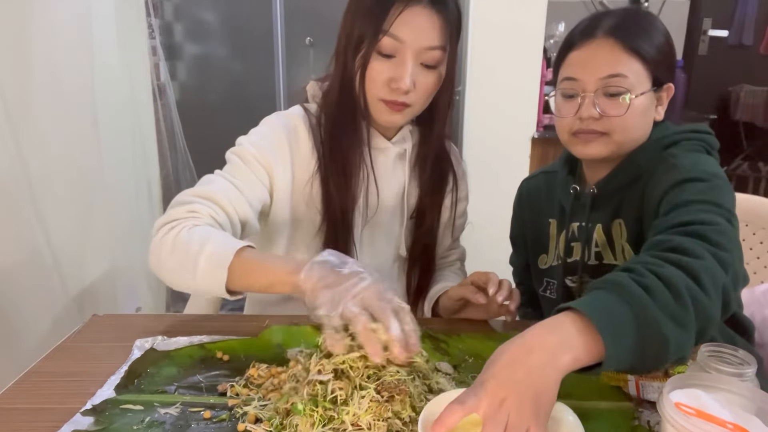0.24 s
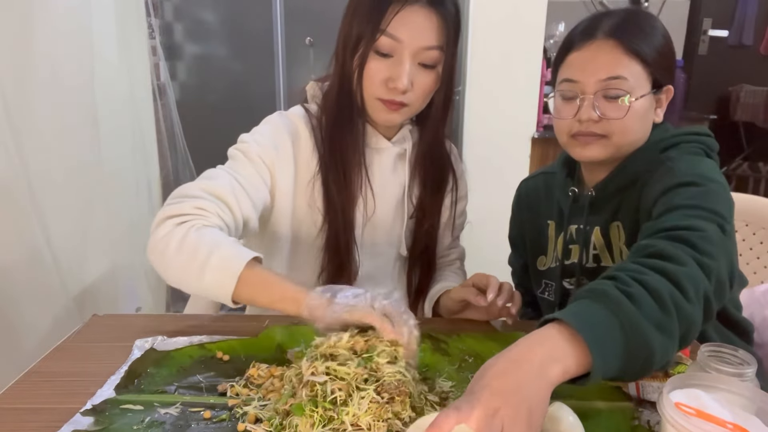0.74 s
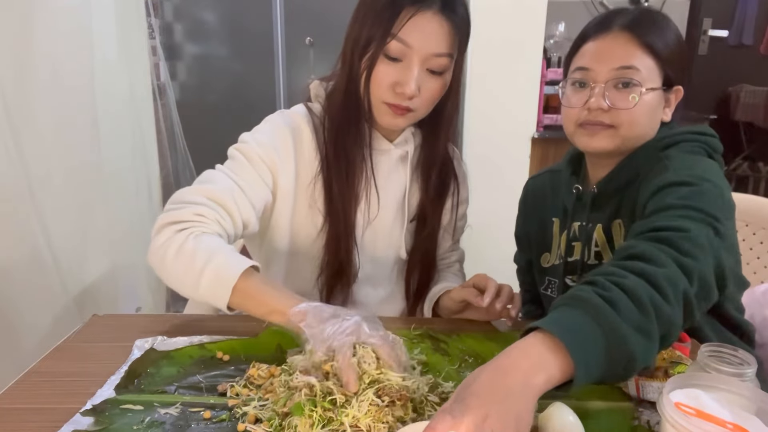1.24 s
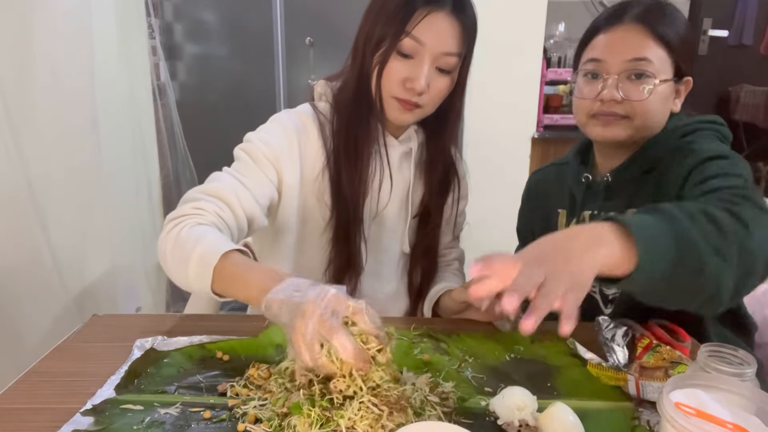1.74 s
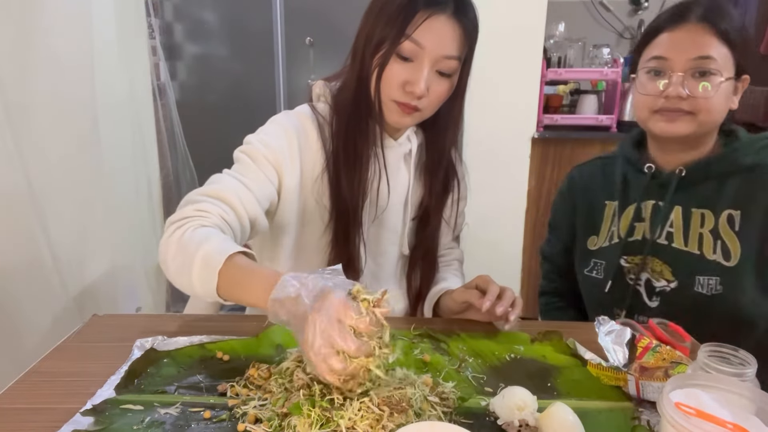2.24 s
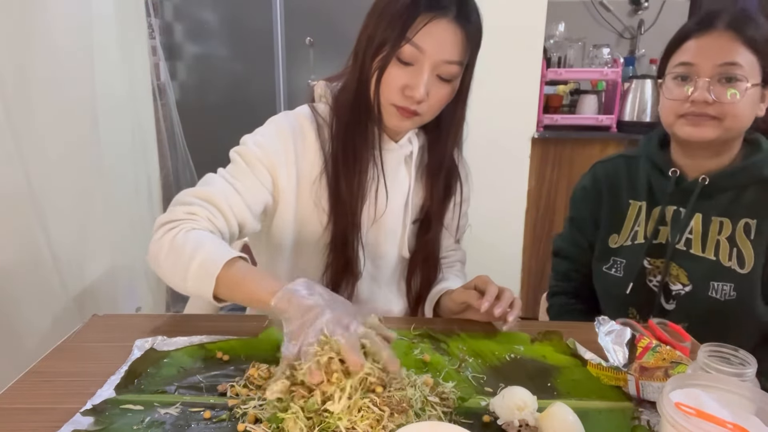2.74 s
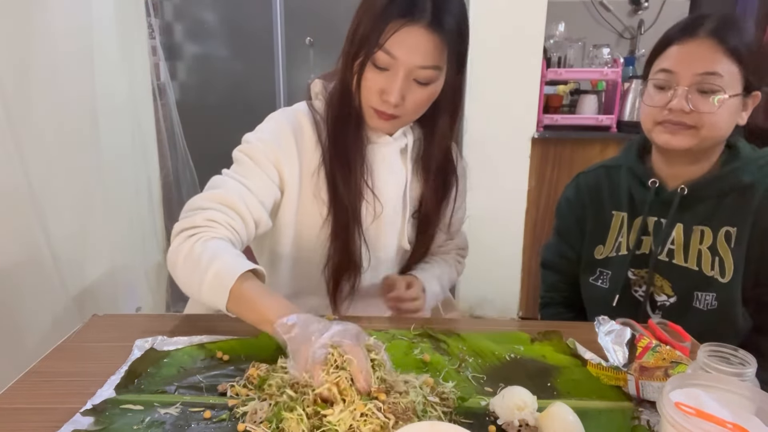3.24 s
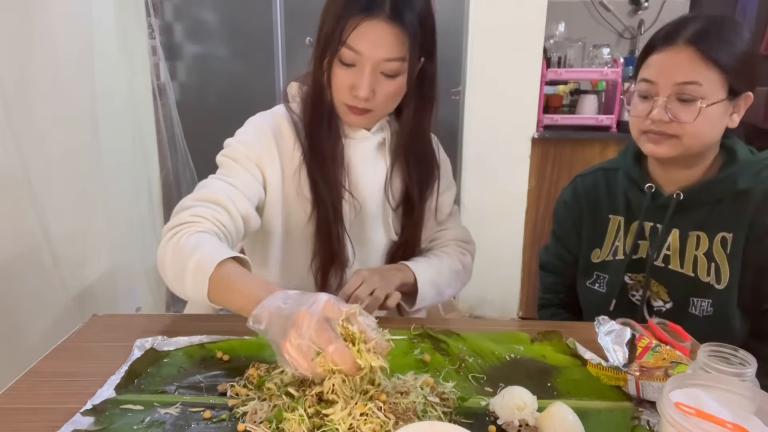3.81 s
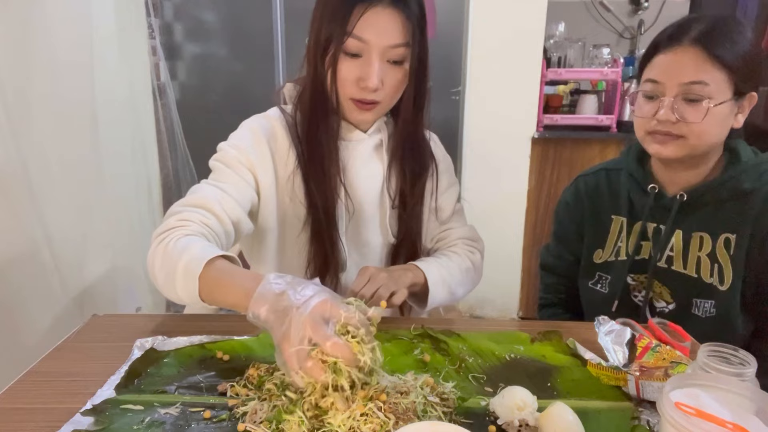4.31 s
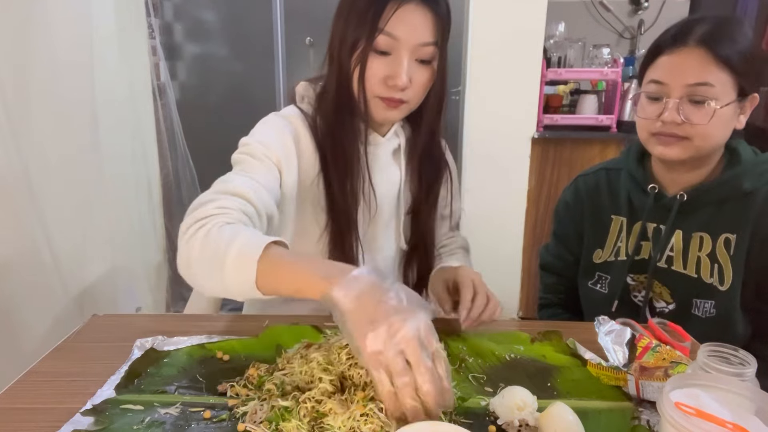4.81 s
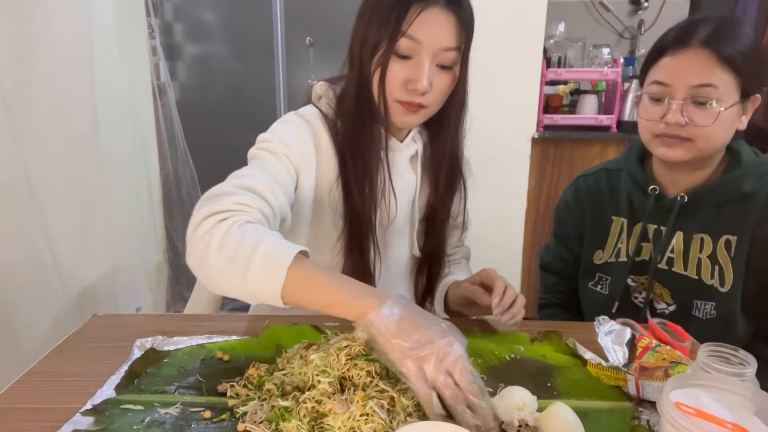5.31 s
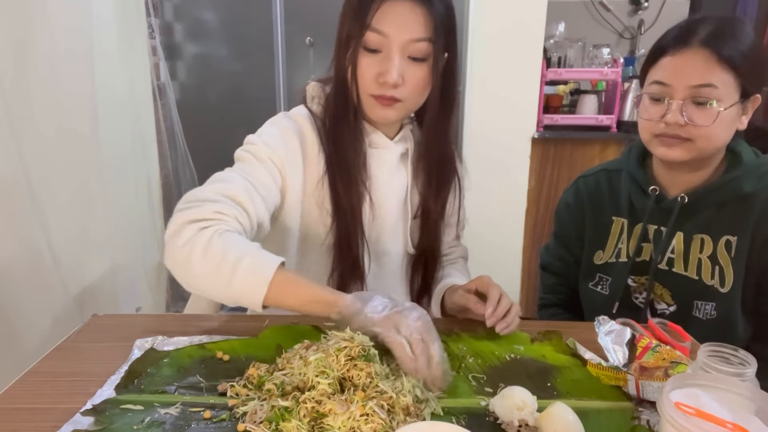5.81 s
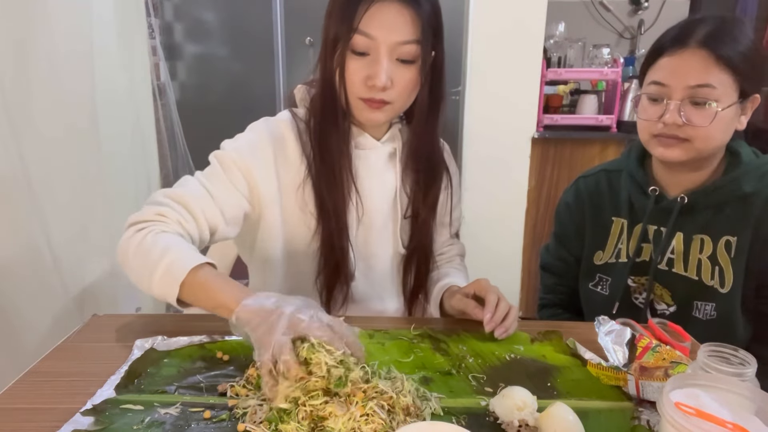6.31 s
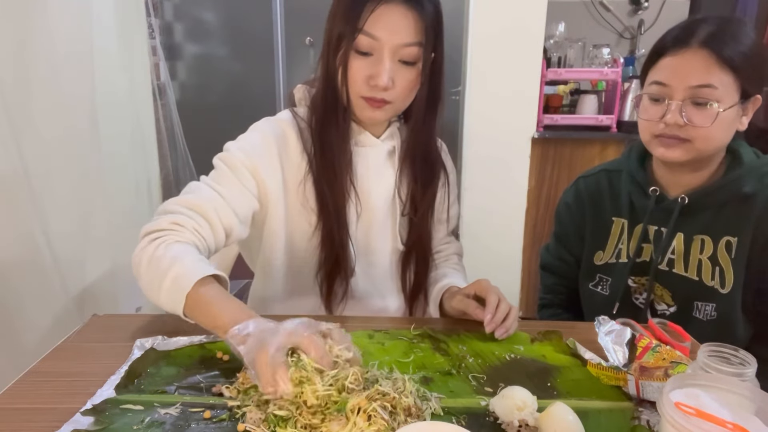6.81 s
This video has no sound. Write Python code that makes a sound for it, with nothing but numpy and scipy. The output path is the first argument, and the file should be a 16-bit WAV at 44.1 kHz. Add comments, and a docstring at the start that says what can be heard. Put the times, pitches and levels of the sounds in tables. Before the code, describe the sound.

A close stereo pickup in a small room, with a faint steady hiss throughout. From the start a gloved hand squeezes wet shreds: bright, fine film crinkle with softer moist sliding, strongest in the first 0.4 s, with a stalk crunch near 0.2 and another at 0.75. A low table thump comes at 1.26, then a soft scuff and light bowl taps around 1.65-1.8. Wooden knocks sound at 1.98, 2.19 and 2.3 while the rustle continues in strokes. A sharp flick, creak and crunch at 3.13 lead into the loudest knock at 3.23, followed by soft scuffs to 3.8. Another knock lands at 4.45; quick film snaps cluster from 4.55 to 5.0. A crisp flick at 5.64 precedes a crunch at 5.85. The rustle thins near 6.1, then returns with a creak at 6.37, low thump at 6.47 and small knock at 6.87.

```python
"""A small room with a wooden table: a gloved hand tosses and squeezes shredded salad on a leaf.
The thin glove film and wet shreds sound as random trains of damped ticks; stalks snap and crunch, the leaf creaks.
Table joints, table top and a small bowl ring as damped modes under knocks, arm pushes and taps; soft scuffs are noise.
Two closely spaced microphones hear level and phase differences and diffuse echoes, over a faint steady hiss."""
import sys
import numpy as np
from scipy import signal
from scipy.fft import rfft, irfft, next_fast_len
from scipy.io import wavfile
from scipy.ndimage import map_coordinates

SR = 44100
rng = np.random.default_rng(int(sys.argv[2]) if len(sys.argv) > 2 else 0)


def materialize(psi):
    """Save the field psi as 16-bit PCM at rate SR to the path in sys.argv[1].

    A 1-D psi becomes a single channel; in a 2-D psi each row is a channel.
    """
    bounded = np.clip(np.atleast_2d(psi).T, -1, 1)
    quanta = np.round(bounded * 32767).astype(np.int16)
    wavfile.write(sys.argv[1], SR, quanta)


N = 310993  # length in samples
CUT_HZ = 15760  # upper band limit, also the highest pitch of the glove's ticks


def amp(db):
    """Level law: decibels to amplitude gain."""
    return 10 ** (np.asarray(db) / 20)


def unit(x):
    """Power normalisation: scale to rms 1."""
    return x / np.sqrt(np.mean(x ** 2) + 1e-20)


def along(points, hz):
    """Logarithmic frequency scale: interpolate (f/Hz, value) points on it."""
    f, value = np.transpose(points)
    return np.interp(np.log(hz + 1), np.log(f + 1), value)


def wobble(rate):
    """Slow random modulation: a smooth curve through rate random knots a second."""
    knots = rng.standard_normal(int(N * rate / SR) + 4)
    return map_coordinates(knots, [np.arange(N) * rate / SR])


def filtered(x, response):
    """Linear filtering: multiply the spectrum by a function of frequency."""
    size = next_fast_len(N + SR // 2)
    hz = np.fft.rfftfreq(size, 1 / SR)
    return irfft(rfft(x, size) * response(hz), size)[..., :N]


def coloured(x, spectrum):
    """Spectral shaping: weight x by a spectrum, then scale to rms 1."""
    return unit(filtered(x, lambda hz: amp(along(spectrum, hz))))


def add(track, s, sound):
    """Superposition: mix a sound in at time s."""
    start = max(round(s * SR), 0)
    track[start:start + len(sound)] += sound[:N - start]


def ring(modes, t, scatter_db, detune):
    """Modal superposition: decaying sines of alternating sign, with random strengths and pitches."""
    total = 0
    for k, (hz, db, t60) in enumerate(modes):
        envelope = amp(db + scatter_db * rng.normal() - 60 * t / t60)
        pitch = rng.normal(hz, detune * hz)
        total = total + (-1) ** k * envelope * np.sin(2 * np.pi * pitch * t)
    return total


def grains(effort, rate, top_hz, life, spread_db, size):
    """Shot noise: damped ticks of random pitch and size, set off more densely by more effort."""
    count = int(rate * N / SR)
    place, pitch, phase, chance = rng.random((count, 4)).T[:, :, None]
    start = np.searchsorted(np.cumsum(effort) / effort.sum(), place)
    t = np.arange(size) / SR
    strength = amp(-spread_db * np.log(np.maximum(chance, .004)))  # few large, many small
    ticks = strength * np.exp(-t / life) * np.cos(2 * np.pi * (pitch * top_hz * t + phase))
    train = np.bincount((start + np.arange(size)).ravel(), ticks.ravel(), N + size)[:N]
    return unit(train / np.sqrt(effort))  # evens out the power, leaving only the density to vary


def clumps(rate, life, depth):
    """Relaxation after random collapses: the power gain jumps, then dies away."""
    count = int(rate * N / SR)
    place, chance = rng.random((count, 2)).T
    jumps = np.bincount((place * N).astype(int), -np.log(np.maximum(chance, .03)), N)
    power = signal.lfilter([1], [1, -np.exp(-1 / (life * SR))], jumps)
    return unit(np.sqrt(1 + depth * power))


def gesture(start, rise, held, fade):
    """Power envelope of one movement: it builds, then decays exponentially from held s after its start."""
    t = np.arange(N) / SR - start
    return (np.clip(t / rise, 0, 1) * np.exp(-np.maximum(t - held, 0) / fade)) ** 2


# background spectrum: f/Hz, relative density/dB
HISS_SPECTRUM = [(25, 21), (60, 9), (90, 6), (160, -3), (300, 7.5), (700, -14), (2000, -4.5), (6000, -1),
                 (10500, -32), (15500, -37)]


def hiss():
    """Partial coherence: steady shaped noise, half private to each microphone and half shared."""
    private, shared = rng.standard_normal((2, N)), rng.standard_normal(N)
    return amp(-61.5) * coloured(private + shared, HISS_SPECTRUM)


# reverberation time of the room, held to at least 0.05 s: f/Hz, t60/s
ROOM_T60 = [(100, 0.86), (400, 0.45), (1300, 0.16), (6000, 0.65), (14000, -6.9)]


def room(x, colour, early, early_s, gap_s):
    """Diffuse reverberation: decaying noise, independent at each microphone and redrawn every 0.1 s."""
    wet, block = np.zeros((2, N + SR)), SR // 10
    hz, t, z = signal.stft(np.zeros(SR // 2), SR, nperseg=256)
    near_walls = early * np.exp(-t / early_s) * (hz / (hz + 1200))[:, None]  # dense early echoes
    decay = amp(-60 * t / np.maximum(along(ROOM_T60, hz), .05)[:, None]) + near_walls
    energy = np.sum(decay ** 2, axis=1, keepdims=True) * t[1] * SR
    shape = amp(along(colour, hz))[:, None] * decay / np.sqrt(energy)
    first_wall = round(gap_s * SR)
    for start in range(0, N, block):
        z = signal.stft(rng.standard_normal((2, SR // 2)), nperseg=256)[2]
        response = signal.istft(z * shape, nperseg=256)[1]
        echo = signal.fftconvolve(x[None, start:start + block], response, axes=1)
        wet[:, start + first_wall:][:, :echo.shape[1]] += echo
    return wet[:, :N]


# spectrum of a sleeve or the bowl sliding on the table: f/Hz, relative density/dB
SCUFF_SPECTRUM = [(70, -5), (190, 2), (420, -6.5), (1000, -26)]
# soft slides: start t/s, fade begins after t/s, level/dB
SCUFFS = [(1.63, 0.15, -56), (3.38, .15, -57.5), (3.75, 0.032, -58.5)]


def scuffs():
    """Sliding friction: dull shaped noise under a power envelope."""
    power = sum(gesture(s, 0.023, held, 0.028) * amp(db) ** 2 for s, held, db in SCUFFS)
    return np.sqrt(power) * coloured(rng.standard_normal(N), SCUFF_SPECTRUM)


# low modes of the whole table top: f/Hz, relative level/dB, t60/s
TOP_MODES = [(88, 1.5, 0.38), (100, -8.5, 0.52), (120, -5, 0.37)]


def sway(t, rise_s):
    """Gradual excitation of resonance: the whole top swings softly into its low modes."""
    return ring(TOP_MODES, t, scatter_db=2, detune=0.022) * (1 - np.exp(-t / rise_s))


CHATTER_DB, CHATTER_S = -10, .025  # leaf and scraps rattle after a blow: start level, decay time
BODY_TOP_HZ = 790  # the extra body acts on modes below this
SPREAD_HZ = 863  # waves below this travel more slowly


def knock(modes, t, bright_hz, body_db=0):
    """Impact and dispersion: a soft contact dulls the ringing modes, and the lows arrive last."""
    weighted = [(hz, db + body_db / (1 + (hz / BODY_TOP_HZ) ** 10), t60) for hz, db, t60 in modes]
    contact = signal.butter(N=4, Wn=bright_hz, fs=SR, output="sos")
    pole = np.exp(-2 * np.pi * SPREAD_HZ / SR)
    bending = [[-pole, 1, 0, 1, -pole, 0]] * 8  # allpass chain
    chatter = amp(CHATTER_DB) * np.exp(-t / CHATTER_S) * rng.standard_normal(len(t))
    struck = ring(weighted, t, scatter_db=2.8, detune=0.0094) + chatter
    sound = signal.sosfilt(np.vstack([contact, bending]), struck)
    return sound / sound[:SR // 100].std()  # rms 1 over the first 10 ms


# modes of the table's joints: f/Hz, relative level/dB, t60/s
JOINT_MODES = [(184.3, -23, 0.21), (261, -26.5, 0.19), (294.7, -17.5, 0.26), (346, -0.5, 0.019),
               (400, -28.5, 0.23), (568, -21, 0.14), (655, -1, 0.018), (937, -2.5, 0.024), (1282, 0, 0.039),
               (1624, 1.5, 0.024), (2010, -6, .013), (2330, -6, 0.016), (2850, -7.5, 0.012)]
# knocks in the joints: t/s, attack level/dB, contact brightness f/Hz, extra low-mode level/dB
KNOCKS = [(.004, -57.5, 410, -20), (1.256, -42.5, 553, -3), (1.271, -48.5, 332, 3), (1.875, -53.5, 1690, 2),
          (1.9787, -41, 2140, 6), (2.1897, -36, 2970, -0.5), (2.2944, -36, 2940, -1.5),
          (2.838, -50, 2860, 8), (3.2323, -30.3, 1750, 4), (3.248, -36.5, 520, -3), (3.2496, -38, 1750, 0),
          (3.272, -46, 450, -6), (4.4527, -34, 2400, -0.5), (4.614, -60, 900, 8), (4.647, -57, 746, 10),
          (6.870, -48.5, 1580, 1.5)]
# modes of a small bowl: f/Hz, relative level/dB, t60/s
BOWL_MODES = [(306, -3, 0.085), (567, 5.5, 0.012), (754, 0, .02), (1340, -5.5, 0.039), (2260, -0.5, 0.016),
              (3040, -3, 0.032), (3720, -1, 0.014)]
# the bowl is set down and rocks to rest: t/s, attack level/dB, contact brightness f/Hz
BOWL_TAPS = [(1.669, -54.5, 600), (1.7029, -55, 800), (1.7088, -42, 4500), (1.716, -44.5, 1400),
             (1.7361, -51, 1500), (1.780, -54, 1410)]
# the arm leans on the top: t/s (the sway starts 6 ms earlier), mode gain/dB, rise t/s
PUSHES = [(.273, -46.5, 0.0064), (0.478, -57, 0.0053), (1.264, -35.5, 0.0029), (2.314, -51, .007),
          (2.925, -42, 0.044), (3.148, -37, 0.005), (3.238, -37, 0.006), (3.459, -48, 0.0062),
          (4.53, -50, 0.013), (6.47, -38, 0.0056)]
SWAY_DB = -21  # sway gain relative to the knock that sets it off


def table():
    """Forced vibration: blows ring joints and bowl, while knocks and pushes sway the top; scuffs are added."""
    taps, swaying, t = np.zeros(N), np.zeros(N), np.arange(SR // 2) / SR
    for s, db, bright_hz, body_db in KNOCKS:
        add(taps, s, amp(db) * knock(JOINT_MODES, t, bright_hz, body_db))
        add(swaying, s, amp(db + SWAY_DB) * sway(t, rise_s=0.013))
    for s, db, bright_hz in BOWL_TAPS:
        add(taps, s, amp(db) * knock(BOWL_MODES, t, bright_hz))
    for s, db, rise_s in PUSHES:
        add(swaying, s - .006, amp(db) * sway(t, rise_s))
    return taps + scuffs(), swaying


# spectrum of the stiff leaf: f/Hz, relative density/dB
LEAF_SPECTRUM = [(400, -13), (1200, 1.5), (2200, -4.5), (4500, -12)]
# the leaf creaks under the hand: start t/s, fade begins after t/s, level/dB
CREAKS = [(0.45, 0.027, -60), (2.838, .014, -57.5), (3.13, 0.0059, -50.5), (6.365, 0.03, -53.5)]
CREAK_RISE_S, CREAK_FADE_S = 0.0017, 0.01


def creaks():
    """Crackling noise: the stiff leaf gives off brief runs of ticks where the hand presses it."""
    power = sum(gesture(s, CREAK_RISE_S, held, CREAK_FADE_S) * amp(db) ** 2 for s, held, db in CREAKS)
    cracking = grains(np.ones(N), rate=1500, top_hz=3000, life=0.00051, spread_db=2, size=140)
    return np.sqrt(power) * coloured(cracking, LEAF_SPECTRUM)


# spectrum of breaking stalks: f/Hz, relative density/dB
STALK_SPECTRUM = [(500, -23), (1400, -11), (2200, -1), (3500, 0), (6000, 0), (9000, -10)]
# crisp stalks are crushed in the fist: start t/s, fade begins after t/s, level/dB
CRUNCHES = [(0.164, 0.051, -49.5), (0.752, 0.013, -49), (3.13, 0.0097, -51), (5.84, 0.031, -51.5)]
CRUNCH_RISE_S, CRUNCH_FADE_S = 0.02, 0.0093


def crunches():
    """Brittle fracture: stalks break in quick, coarse runs of ticks."""
    power = sum(gesture(s, CRUNCH_RISE_S, held, CRUNCH_FADE_S) * amp(db) ** 2 for s, held, db in CRUNCHES)
    breaking = grains(np.ones(N), rate=1200, top_hz=6380, life=0.00056, spread_db=6.0, size=110)
    return np.sqrt(power) * coloured(breaking, STALK_SPECTRUM)


# sharp snaps of glove film and stalks: t/s (sounding 0.986 ms later), relative level/dB, f/Hz
SNAPS = [(0.102, -30, 9900), (0.168, -28.5, 5900), (0.203, -33, 2200), (0.258, -37, 10300),
         (0.391, -37, 10350), (0.758, -33, 9100), (0.761, -38, 5700), (0.863, -36.5, 5330),
         (0.999, -35.5, 10300), (1.825, -36, 9830), (3.133, -48, 10200), (3.134, -30, 1800),
         (3.659, -36, 6900), (3.922, -34.5, 10100), (4.566, -34, 9200), (4.6155, -39, 10200),
         (4.7247, -42, 10500), (4.856, -41, 10300), (4.87, -36, 10300), (5.014, -36, 10200),
         (5.4883, -33.5, 9400), (5.6366, -39, 10300), (6.017, -38, 10200)]


def snaps():
    """Sudden release: a crease flips or a stalk breaks with a damped tick and brief after-crackle."""
    track, t = np.zeros(N), np.arange(SR // 40) / SR
    for s, db, hz in SNAPS:
        tick = np.exp(-t / 0.0014) * np.cos(2 * np.pi * hz * t)
        crackle = 0.53 * np.exp(-t / 0.0021) * rng.standard_normal(len(t))
        add(track, s + 0.000986, amp(db + 2.5) * (tick + crackle))
    return filtered(track, lambda hz: hz / (hz + 2000))  # gentle bass cut


# the hand gathers, squeezes or lifts: start t/s, fade begins after t/s, glove level/dB, shreds level/dB
STROKES = [(-0.09, 0.16, -47.0, -59.5), (0.05, 0.16, -40.5, -50.0), (0.35, 0.29, -47.0, -55.0),
           (0.87, 0.29, -46.5, -58.5), (1.18, 0.07, -41.0, -50.0), (1.31, 0.24, -45, -56.0),
           (1.73, 0.27, -46.5, -58.5), (1.97, 0.4, -43.5, -53.5), (2.4, 0.27, -52.0, -66.5),
           (2.64, 0.15, -43.5, -56.0), (2.82, 0.3, -46.0, -54.5), (3.22, 0.25, -48.5, -58.5),
           (3.51, 0.11, -46.5, -60.0), (3.84, 0.12, -45.0, -60.0), (4.07, 0.07, -44.0, -58.5),
           (4.21, 0.28, -44.0, -57.0), (4.5, 0.29, -50.0, -62.5), (4.74, 0.23, -47.0, -61.5),
           (5.1, 0.34, -45.0, -56.5), (5.66, 0.21, -45.5, -54.0), (6.17, 0.23, -48.5, -60.0),
           (6.42, 0.37, -46.0, -54.0), (6.83, 0.25, -48.0, -60.0)]
ATTACK_S, RELEASE_S = .095, .11  # the grip tightens, then film and pile relax
# quick flicks of the fingers: t/s, glove level/dB
FLICKS = [(0.39, -48), (0.756, -45), (0.862, -49), (2.355, -43), (2.935, -43), (3.134, -40), (3.925, -46),
          (4.563, -49), (4.6155, -45), (4.7237, -45), (4.86, -44), (5.009, -43), (5.202, -46), (5.486, -48),
          (5.64, -39), (6.736, -45)]
FLICK_RISE_S, FLICK_FADE_S = .004, .03
FLICK_SHREDS_DB = -10.5  # a flick stirs the shreds less than the film
IDLE_GLOVE_DB, IDLE_SHREDS_DB = -53, -65  # the hand only moving between strokes
# the hand lets go and hovers above the pile: centre t/s, Gaussian 1/e half width t/s, level change/dB
PAUSES = [(0.83, .03, -2), (3.74, .04, -2), (5.099, .03, -4), (6.08, .075, -7)]


def handwork():
    """Power addition: strokes and flicks add to the idle movement, giving glove and shred levels in dB."""
    glove, shreds = amp(IDLE_GLOVE_DB) ** 2, amp(IDLE_SHREDS_DB) ** 2
    moves = []
    for s, held, glove_db, shreds_db in STROKES:
        moves.append((gesture(s, ATTACK_S, held, RELEASE_S), glove_db, shreds_db))
    for s, db in FLICKS:
        moves.append((gesture(s, FLICK_RISE_S, 0, FLICK_FADE_S), db, db + FLICK_SHREDS_DB))
    for power, glove_db, shreds_db in moves:
        glove = glove + power * amp(glove_db) ** 2
        shreds = shreds + power * amp(shreds_db) ** 2
    t = np.arange(N) / SR
    pause_db = sum(db * np.exp(-((t - s) / width) ** 2) for s, width, db in PAUSES)
    return 10 * np.log10([glove, shreds]) + pause_db


# spectrum of the glove film: f/Hz, relative density/dB
FILM_SPECTRUM = [(300, -24), (1500, -18.5), (3000, -10.5), (4500, -8.5), (6800, -1.74), (8000, 0.3),
                 (10400, 2), (11500, -3), (13000, -5.5), (15500, -11)]
# spectrum of the wet shreds: f/Hz, relative density/dB
SQUISH_SPECTRUM = [(60, -13), (88, 10.5), (160, -4), (320, -0.5), (700, -3), (1250, 1.5), (1900, -2.5),
                   (3200, -4), (6000, -4.5), (10000, -6)]


def mixing():
    """Buckling and wet friction: film gives clumps of bright ticks; shreds slide and pop lower down."""
    glove_db, salad_db = handwork()
    giving = clumps(rate=70, life=0.0078, depth=0.49) * amp(1.13 * wobble(22))  # shared unevenness
    crinkle = grains(amp(glove_db / 2), rate=9000, top_hz=CUT_HZ, life=0.000098, spread_db=2.0, size=36)
    pops = grains(amp(salad_db / 2), rate=2600, top_hz=7500, life=0.00031, spread_db=2.5, size=100)
    film_noise = 0.41 * rng.standard_normal(N)
    sliding = .5 * rng.standard_normal(N)
    glove = amp(glove_db - 0.26) * coloured(crinkle + film_noise, FILM_SPECTRUM)
    salad = amp(salad_db) * coloured(pops + sliding, SQUISH_SPECTRUM)
    return giving * (glove + clumps(rate=51, life=0.0022, depth=0.46) * salad)


# the hand's sideways place, as extra delay at the left microphone: t/s, delay/ms
SWEEP = [(.1, 0.045), (.9, 0.029), (1.1, -0.0025), (4.5, -0.028), (5.2, 0.092), (5.8, 0.052), (6.2, -0.083)]
SWEEP_TOP_HZ = 6920  # the treble above this keeps its place


def swept(x):
    """Interaural-type delay: the moving hand reaches the two microphones with a changing lag."""
    hz, t, z = signal.stft(x, SR, nperseg=512)
    lag_s = np.interp(t, *np.transpose(SWEEP)) / 1000
    turn = np.pi * (hz / (1 + (hz / SWEEP_TOP_HZ) ** 20))[:, None] * lag_s  # half the lag on each side
    pair = np.array([z * np.exp(-1j * turn), z * np.exp(1j * turn)])
    return signal.istft(pair, nperseg=512)[1][:, :N]


# phase by which the left microphone trails the right: f/Hz, phase/rad
TRAIL = [(100, 0.25), (1300, 0.5), (2100, 1), (3200, 0.62), (4300, 1.34), (6800, 3), (8200, 3),
         (10000, 1.31), (11200, 0.26), (12700, -0.5), (13600, -1.8), (14500, -3)]
# level difference, left minus right: f/Hz, level/dB
LEAN = [(80, -3.5), (300, -8.5), (1200, -3), (2000, -2), (3200, -2.5), (5000, -8), (6600, -10),
        (8000, -0.5), (10500, -0.2)]
# hand's echo against its direct sound, nominal: f/Hz, level/dB
HAND_ROOM_DB = [(100, -4), (350, -6), (800, 5.5), (1300, -2), (2500, 1), (5500, 0.5), (8000, -14),
                (15000, -52)]
# table's echo against its direct sound, nominal: f/Hz, level/dB
TABLE_ROOM_DB = [(100, -4.5), (300, -4.5), (700, -2), (1300, -6.5), (2400, -0.5)]


def placed(hand, taps, swaying):
    """Two-microphone localisation: phase places the direct sound; level differences act on echoes too."""
    sides = np.array([[1], [-1]])  # left, right
    sources = swept(hand) + taps + swaying
    direct = filtered(sources, lambda hz: np.exp(-1j * sides * along(TRAIL, hz) / 2))
    hand_echo = room(hand, HAND_ROOM_DB, early=5.4, early_s=0.0016, gap_s=0.0015)
    table_echo = room(taps, TABLE_ROOM_DB, early=0.31, early_s=0.012, gap_s=.008)
    return filtered(direct + hand_echo + table_echo, lambda hz: amp(sides * along(LEAN, hz) / 2))


def scene():
    """Superposition of sources: hand and table in the room, over the background."""
    hand = mixing() + crunches() + creaks() + snaps()
    taps, swaying = table()
    return placed(hand, taps, swaying) + hiss()


def record(dry):
    """Band limitation: deep bass is thinned and nothing passes above the upper limit."""
    thinned = signal.sosfilt(signal.butter(3, 65, "high", fs=SR, output="sos"), dry)
    return filtered(thinned, lambda hz: hz < CUT_HZ)


dry = scene()
out = record(dry)
materialize(out)
```